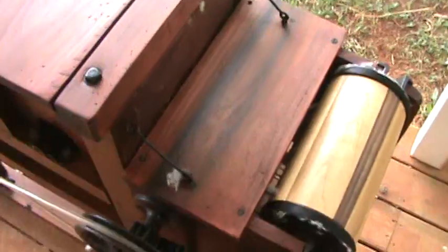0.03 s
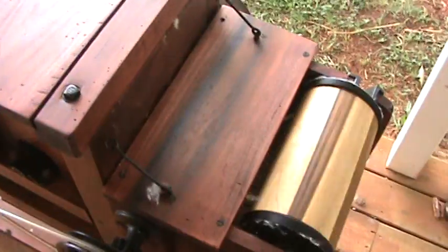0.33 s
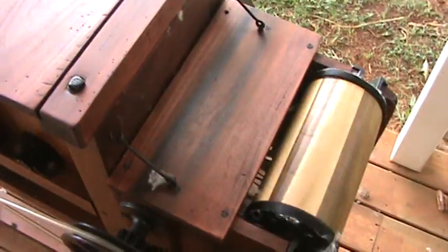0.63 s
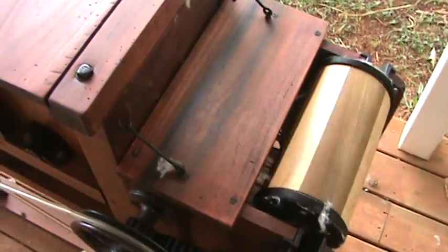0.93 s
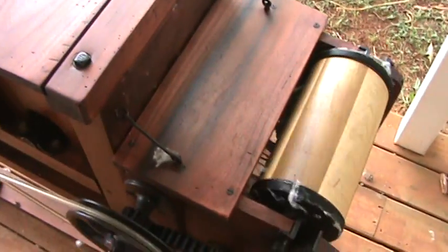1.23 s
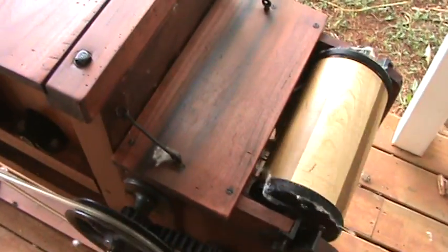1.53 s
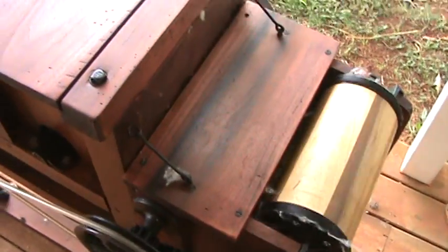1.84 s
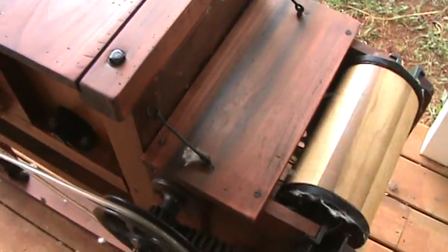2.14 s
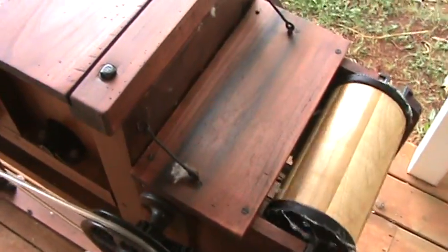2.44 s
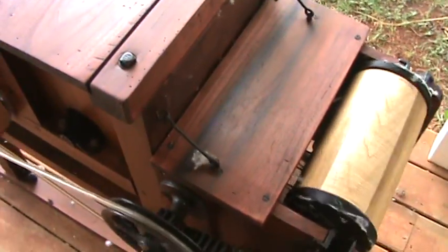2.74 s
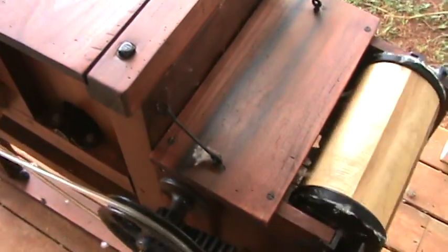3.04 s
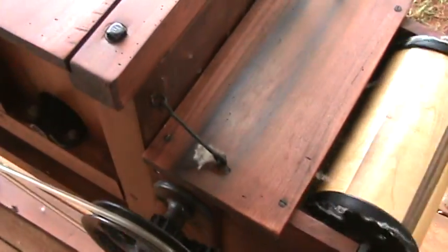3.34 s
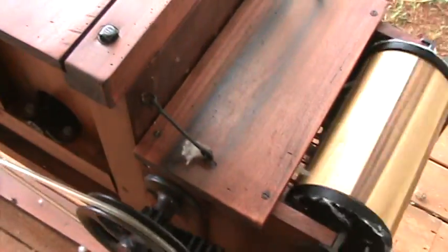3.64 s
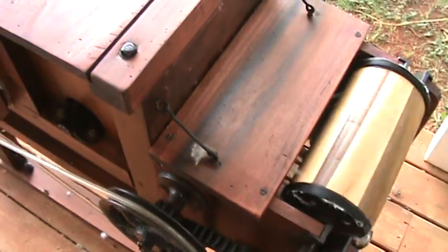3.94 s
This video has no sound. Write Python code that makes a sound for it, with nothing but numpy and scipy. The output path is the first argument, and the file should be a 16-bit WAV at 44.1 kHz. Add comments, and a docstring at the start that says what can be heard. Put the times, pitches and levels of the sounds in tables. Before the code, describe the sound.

A wooden machine runs with a throbbing hum, hiss, knocks and occasional metal clashes.

```python
"""Small wooden cotton gin on a deck

Close by, the gears hum and throb with each turn of the fast shaft; a panel drones as they slow.
Play in the shafts knocks the frame. The saws scrape and rasp in swells under the hiss of the brush.
Four times a loose iron part drops with a bright clash, and the gain control ducks."""
import sys
import numpy as np
from scipy import signal
from scipy.fft import rfft, irfft
from scipy.io import wavfile
from scipy.ndimage import uniform_filter1d

SR = 44100
rng = np.random.default_rng(int(sys.argv[2]) if len(sys.argv) > 2 else 0)


def pcm_store(signal):
    """Save signal as 16-bit PCM."""
    levels = np.round(np.clip(np.atleast_2d(signal), -1, 1) * 32767)
    wavfile.write(sys.argv[1], SR, levels.astype(np.int16).T)


N = 176400
T = np.arange(N) / SR
HZ = np.fft.rfftfreq(N, 1 / SR)

# fast shaft (time [s], speed [turns/s])
SHAFT_SPEED = [(0.0, 10.13), (0.25, 10.06), (0.8, 10.16), (1.25, 11.09), (1.62, 11.18), (1.84, 10.14),
               (2.0, 10.74), (2.3, 10.93), (2.6, 11.38), (2.82, 11.23), (3.05, 10.29), (3.4, 10.8),
               (3.7, 10.98), (4.0, 10.86)]
# gear hum (harmonic, level [dB], throb depth [dB], throb lag [turns])
MESH_HARMONICS = [(1, -34.5, 1.5, -0.12), (2, -35, 6.5, 0.062), (4, -56.5, 16.5, -0.017)]
# wooden frame (frequency [Hz], relative level [dB], t60 [s])
FRAME_MODES = [(158, -6, 0.091), (260, -12, 0.32), (265.5, 5.5, 0.29), (306.8, 1.5, 0.11),
               (379.4, -8.5, 0.24), (538, -9, 0.093), (635, -4.5, 0.3), (681, 1.5, 0.19), (721, -2, 0.078),
               (843, -10, 0.03)]
# rumble of the boards (frequency [Hz], relative density [dB])
RUMBLE_SPECTRUM = [(20, -11), (75, -12), (125, -35), (200, -47), (350, 9), (480, -8.5), (780, -2),
                   (950, 3.5), (1800, -0.5), (3000, -14), (16000, -58)]
# frame knocks (time [s], relative thud level [dB], rattle level [dB])
FRAME_KNOCKS = [(0.069, -20, -26), (0.318, -16, -24.5), (.902, -11.5, -25), (1.174, -29, -24),
                (1.354, -22, -30), (1.621, -16, -22), (1.904, -13, -21.5), (2.102, -20, -21),
                (2.356, -15, -23.5), (2.55, -19, -32), (2.636, -14, -16), (2.888, -24, -23.5),
                (3.386, -16, -22.5), (3.661, -15, -19.5), (3.919, -14, -25), (3.945, -18.5, -20.5)]
# wooden fittings (frequency [Hz], relative level [dB], t60 [s])
FITTING_MODES = [(925, -0.5, 0.24), (1345, 4, 0.1), (1625, -3, .12), (1756, -0.5, 0.057),
                 (2196, -1.5, 0.14), (2420, -3, 0.14), (3040, -2.5, 0.16), (4160, -9, 0.04)]
# rattle of a knock (frequency [Hz], relative density [dB])
RATTLE_SPECTRUM = [(60, -45), (200, 3), (600, 2.5), (1300, 4.5), (2400, 2.5), (4000, -3), (8000, -16),
                   (16000, -51)]
# one rub per saw turn (time [s], relative level [dB])
SAW_RUBS = [(.1, -8), (.37, -13), (.82, -8.5), (1.139, -2.5), (1.44, -4), (1.761, -11), (2.152, -4.5),
            (2.46, -2), (2.83, -2), (3.19, -3.5), (3.52, -3.5), (3.86, -4)]
# rubbing saws (frequency [Hz], relative density [dB])
SCRAPE_SPECTRUM = [(200, -15.5), (950, -38), (1130, 3), (1230, -6), (1370, 0.5), (1440, -9), (1650, -11.5),
                   (1740, -3), (1900, -63), (2700, -53), (3700, -11), (4800, -17.5), (16000, -55.5)]
# brush and saw teeth (frequency [Hz], relative density [dB])
HISS_SPECTRUM = [(300, 8), (2000, 0.5), (2650, 0.5), (3600, 2.5), (4900, -0.5), (5700, -1.5), (7000, 5),
                 (8000, 0.5), (8750, 0), (9400, 2.5), (10400, -6.5), (11800, -14), (13500, -19.5),
                 (15500, -17)]
# saw notes (time [s], level [dB], Gaussian sigma [s], centre pitch [Hz])
SAW_RASPS = [(.08, -31, 0.024, 1300), (.4, -29.5, 0.076, 1295), (.74, -27.5, 0.02, 1326),
             (1.12, -32.5, .05, 1180), (1.39, -29, 0.036, 1270), (1.78, -30.5, 0.047, 1216),
             (2.125, -24, 0.033, 1223), (2.4, -28, 0.057, 1290), (2.805, -25.5, 0.038, 1295),
             (3.17, -23, 0.031, 1198), (3.49, -36, .045, 1248), (3.82, -28.5, .03, 1164),
             (3.935, -24, 0.028, 1256)]
# ironwork (frequency [Hz], relative level [dB], t60 [s])
IRON_MODES = [(1330, 1, .22), (1484, -4, .2), (1733, -2, .22), (2003, -7, .2), (2849, -5, .22),
              (3489, -7, .2), (5142, -6, .2), (6130, -8, .2), (6622, -6, .16), (6950, -7, .1),
              (9460, -10, .1)]
# loose iron (time [s], level [dB], rebound delay [s], rebound gain [dB], note [Hz], note gain [dB])
IRON_DROPS = [(0.177, -13, 0.036, -11.5, 6130, -28), (0.6, -16.5, 0.042, -16, 6620, -27),
              (1.819, -13.5, 0.044, -11.5, 2987, -12), (3.061, -10.5, 0.058, -10.5, 6340, -26)]
# chatter of a clash (frequency [Hz], relative density [dB])
CLASH_SPECTRUM = [(40, 7), (150, -11), (700, 0), (1400, 7.5), (2500, 0.5), (2950, 6.5), (4500, 2.5),
                  (6500, 8), (8200, 4.5), (9600, 3), (11500, -6.5), (16000, -21.5)]
# stereo width (frequency [Hz], side minus mid [dB])
STEREO_WIDTH = [(60, -14), (99, 4), (160, -6), (270, -2), (450, -4.5), (740, -7.5), (1220, -7.5),
                (2010, -10.5), (3330, -10), (5500, -15.5), (9080, -9.5), (15000, 10.5)]
# side signal (frequency [Hz], lag share, level-difference share)
SIDE_SHARES = [(60, 0.39, -0.033), (163, -0.89, -0.39), (283, -0.96, -0.086), (700, -0.69, -0.013),
               (1260, -0.67, 0.38), (2500, 1, 0.26), (5400, 0.9, 0.4), (9000, 0.94, -0.07), (13000, 1, 0),
               (16300, 0.99, -0.42)]

TEETH = 14
THROB_AT_TURN, THUMP_AT_TURN, FASTEST_AT_TURN = .034, .063, .8


def gears(turns, speed_hz):
    """Meshing teeth hum and tap the frame; once a turn the shaft labours, sags in speed and thumps."""
    speed_swing, speed_jitter, hum_db_per_hz = .041, .012, 2.5
    sag_turns = speed_swing * np.sin(2 * np.pi * (turns - FASTEST_AT_TURN)) / (2 * np.pi)
    jitter_turns = speed_jitter * np.cumsum(wander(30) * np.gradient(turns))
    mesh_cycles = TEETH * (turns + sag_turns + jitter_turns)
    hum = np.zeros(N)
    for harmonic, db, depth_db, lag_turns in MESH_HARMONICS:
        level = amp(db + 1.2 * wander(11)) * throb(turns, depth_db, lag_turns)
        hum += level * np.sqrt(2) * np.sin(2 * np.pi * harmonic * mesh_cycles)
    hum *= amp(hum_db_per_hz * (speed_hz - speed_hz.mean()))
    tooth_hits = np.diff(np.floor(mesh_cycles), prepend=0)
    taps = unit(tooth_hits * amp(4.1 * rng.standard_normal(N)))
    drive = .31 * (taps - taps.mean()) + grains(per_s=2500, spread_db=1.44)
    frame = radiate(ring(drive * throb(turns, depth_db=3.5, lag_turns=-.17), FRAME_MODES))
    rumble = colour(drive * throb(turns, depth_db=3), RUMBLE_SPECTRUM)
    thumps = thud(np.diff(np.floor(turns - THUMP_AT_TURN), prepend=-1))
    return hum + amp(-32) * unit(frame) + amp(-21.5) * thumps + amp(-33) * rumble


def panel(turns, speed_hz):
    """A panel drones when the slowing gears bring their second harmonic near its pitch."""
    pitch_hz, half_width_hz, waver_hz = 269, 8.9, 3.3
    resonance = 1 / (1 + ((2 * TEETH * speed_hz - pitch_hz) / half_width_hz) ** 2)
    phase = 2 * np.pi * np.cumsum(pitch_hz + waver_hz * wander(12.3)) / SR
    return amp(-30.5) * resonance * throb(turns, depth_db=9) * np.sin(phase)


def knocks():
    """Play in the shafts thumps the frame and clacks its fittings."""
    blows, envelope = np.zeros(N), np.zeros(N)
    for start_s, thud_db, rattle_db in FRAME_KNOCKS:
        blows[round(start_s * SR)] = amp(thud_db + 9)
        envelope += amp(rattle_db) * burst(start_s, rise_s=.0015, decay_s=.016)
    rattle = envelope * colour(grains(per_s=6000, spread_db=.4), RATTLE_SPECTRUM)
    return thud(blows) + rattle + .7 * ring(rattle, FITTING_MODES)


def thud(blows):
    """Soft blows ring the frame above its lowest mode."""
    contact_s = .002
    push = np.hanning(round(contact_s * SR))
    response = np.convolve(modes(FRAME_MODES[1:]), push / push.sum())
    return radiate(signal.fftconvolve(blows, response)[:N])


def radiate(x, cutoff_hz=153):
    """The small frame gives off little bass."""
    return signal.sosfilt(signal.butter(3, cutoff_hz, "high", fs=SR, output="sos"), x)


def saws(turns):
    """Saw teeth scrape in swells and the brush hisses over them, ringing the iron."""
    floor = .41
    rub = floor + (1 - floor) * sum(amp(db) * swell(peak_s, sigma_s=.085) for peak_s, db in SAW_RUBS)
    scrape_level = amp(-27 + 2.4 * wander(16)) * rub
    scrape = scrape_level * colour(grains(per_s=2500, spread_db=2.4), SCRAPE_SPECTRUM)
    hiss_level = amp(-25.5 + 1.44 * wander(25)) * rub ** .65 * throb(turns, depth_db=.13, lag_turns=.033)
    hiss = hiss_level * colour(grains(per_s=9000, spread_db=.51), HISS_SPECTRUM)
    iron = amp(-36) * ring(rub * grains(per_s=1500, spread_db=20), IRON_MODES)
    return scrape + hiss + iron


def rasps():
    """Near the height of each rub a saw sings a rough, falling note."""
    fall_hz_per_s, half_width_hz = 900, 104
    roughness = wander(half_width_hz) + 1j * wander(half_width_hz)
    out = np.zeros(N)
    for peak_s, db, sigma_s, centre_hz in SAW_RASPS:
        pitch_hz = centre_hz - fall_hz_per_s * (T - peak_s)
        note = (roughness * np.exp(2j * np.pi * np.cumsum(pitch_hz) / SR)).real
        out += amp(db) * swell(peak_s, sigma_s) * note
    return out


def clashes():
    """Loose iron drops, chatters and rebounds; a cloud of modes, the ironwork and one note ring on."""
    rise_s, decay_s = .0108, .035
    cloud_range_hz, cloud_t60_s, note_t60_s = (2800, 7200), .19, .15
    grit = colour(grains(per_s=20000, spread_db=1), CLASH_SPECTRUM)
    out = np.zeros(N)
    for start_s, db, delay_s, rebound_db, note_hz, note_db in IRON_DROPS:
        drop = burst(start_s, rise_s, decay_s)
        rebound = amp(rebound_db) * burst(start_s + delay_s, rise_s, decay_s)
        chatter = amp(db) * (drop + rebound) * grit
        cloud = [(hz, 0, cloud_t60_s) for hz in rng.uniform(*cloud_range_hz, size=18)]
        note = amp(note_db) * ring(chatter, [(note_hz, 0, note_t60_s)])
        out += chatter + .55 * ring(chatter, cloud) + .34 * ring(chatter, IRON_MODES) + note
    return out


def deck_stereo(mid):
    """Sound reaches two close microphones, directly and scattered by the deck."""
    echoes = rng.standard_normal(N) * burst(.002, rise_s=.003, decay_s=.03)
    lag, pan = curve(SIDE_SHARES), curve(SIDE_SHARES, column=2)
    scatter_share = np.sqrt(np.clip(1 - lag ** 2 - pan ** 2, 0, 1))
    scatter = scatter_share * rfft(echoes / np.linalg.norm(echoes))
    side = irfft(rfft(mid) * amp(curve(STEREO_WIDTH)) * (1j * lag + pan + scatter), N)
    return np.array([mid + side, mid - side])


def amp(db):
    """Decibels to gain."""
    return 10 ** (np.asarray(db) / 20)


def unit(x):
    """Scales to rms 1."""
    return x / np.sqrt(np.mean(x ** 2) + 1e-20)


def curve(table, column=1):
    """Table column interpolated over log frequency."""
    columns = np.transpose(table)
    return np.interp(np.log(HZ + 1), np.log(columns[0] + 1), columns[column])


def colour(x, spectrum):
    """Filters x by a spectrum, rms 1."""
    return unit(irfft(rfft(x) * amp(curve(spectrum)), N))


def wander(rate_hz):
    """Low-passed noise, rms 1."""
    return unit(irfft(rfft(rng.standard_normal(N)) / (1 + (HZ / rate_hz) ** 4), N))


def grains(per_s, spread_db):
    """Tiny random impacts of uneven size, rms 1."""
    size = amp(spread_db * np.minimum(rng.exponential(1, N), 4))
    return unit(size * rng.choice([-1, 1], N) * (rng.random(N) < per_s / SR))


def modes(table):
    """Impulse response of damped modes, peak 1."""
    t = T[:SR // 2]
    body = sum(amp(db) * np.exp(-np.log(1000) * t / t60_s) / t60_s * np.sin(2 * np.pi * hz * t)
               for hz, db, t60_s in table)
    return body / abs(body).max()


def ring(x, table):
    """Rings modes with x, keeping its level."""
    return np.std(x) * unit(signal.fftconvolve(x, modes(table))[:N])


def burst(start_s, rise_s, decay_s):
    """Envelope: linear rise, exponential fall."""
    age_s = T - start_s
    return np.clip(age_s / rise_s, 0, 1) * np.exp(-np.maximum(age_s - rise_s, 0) / decay_s)


def swell(peak_s, sigma_s):
    """Gaussian envelope."""
    return np.exp(-.5 * ((T - peak_s) / sigma_s) ** 2)


def throb(turns, depth_db, lag_turns=0):
    """Gain that swells once per turn of the fast shaft."""
    return amp(depth_db * np.cos(2 * np.pi * (turns - THROB_AT_TURN - lag_turns)))


def scene():
    """The running gin, in stereo."""
    speed_hz = np.interp(T, *np.transpose(SHAFT_SPEED))
    turns = np.cumsum(speed_hz) / SR
    gin = gears(turns, speed_hz) + panel(turns, speed_hz) + knocks() + saws(turns) + rasps() + clashes()
    return deck_stereo(gin)


def record(dry):
    """Gain control keyed by treble peaks, short fade-in, bass cut, band limit."""
    threshold_db, ratio, recover_db_per_s, smooth_s = -9, 14, 70, .001
    bass_hz, band_edge_hz = 119, 15900
    treble = signal.lfilter([1.35, -1.05], [1], dry)
    peak_db = 20 * np.log10(abs(treble).max(0) + 1e-9)
    recovery_db = T * recover_db_per_s
    held_db = np.maximum.accumulate(peak_db + recovery_db) - recovery_db
    over_db = uniform_filter1d(np.maximum(held_db - threshold_db, 0), round(smooth_s * SR))
    fade_in = np.clip((T - .042) / .017, 0, 1)
    ducked = dry * amp(-(1 - 1 / ratio) * over_db) * fade_in
    bass = signal.sosfiltfilt(signal.butter(4, bass_hz, fs=SR, output="sos"), ducked)
    lowpass = signal.firwin(511, band_edge_hz, window=("kaiser", 9), fs=SR)
    return signal.oaconvolve(ducked - .82 * bass, lowpass[None], "same")


dry = scene()
out = record(dry)
pcm_store(out)
```